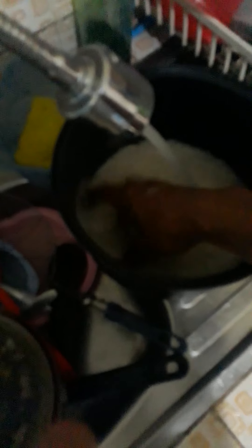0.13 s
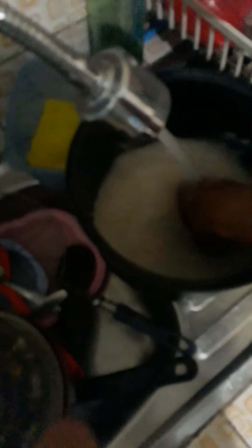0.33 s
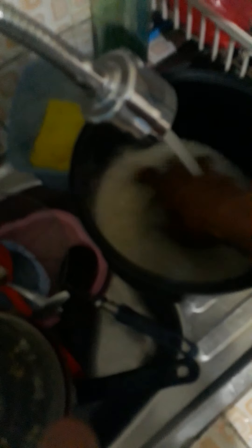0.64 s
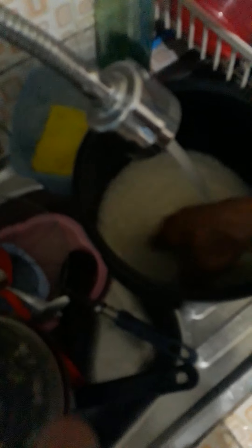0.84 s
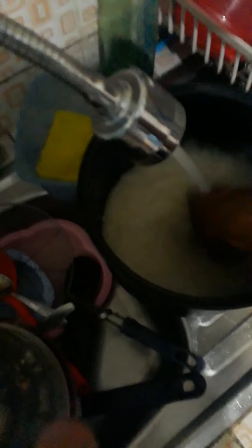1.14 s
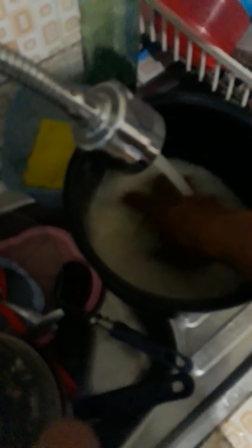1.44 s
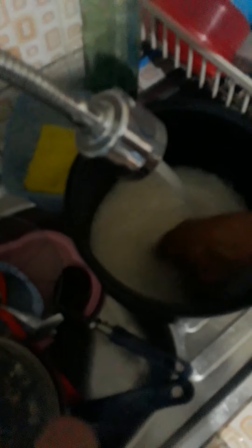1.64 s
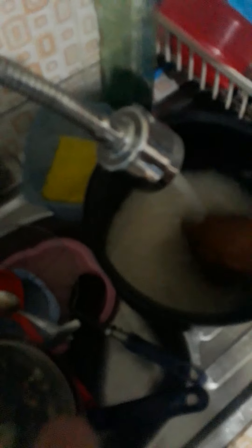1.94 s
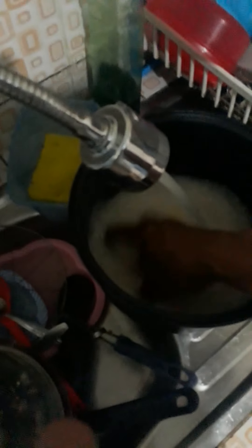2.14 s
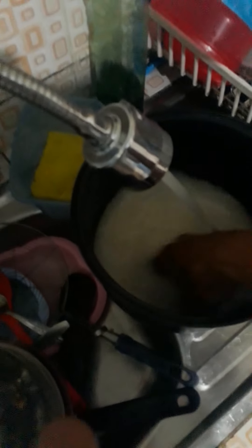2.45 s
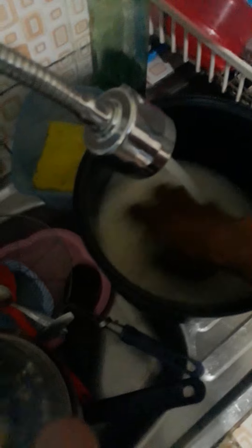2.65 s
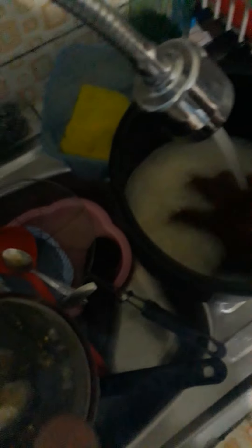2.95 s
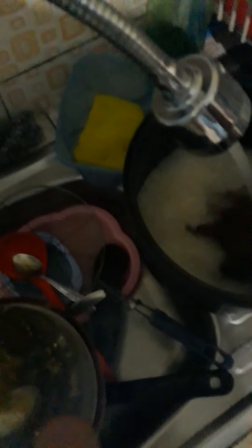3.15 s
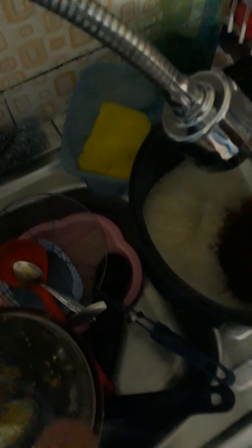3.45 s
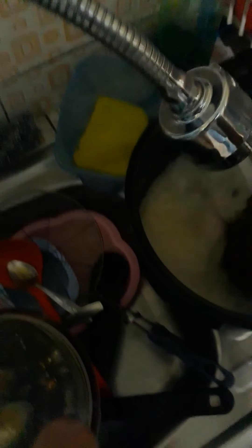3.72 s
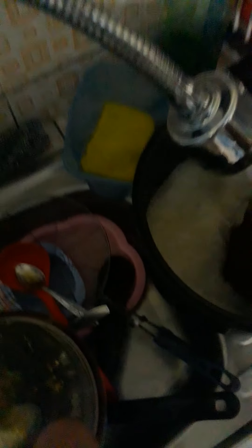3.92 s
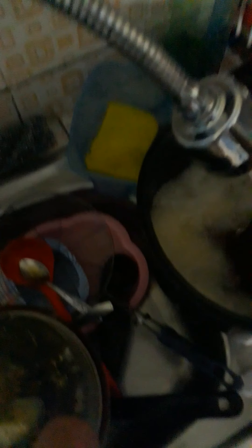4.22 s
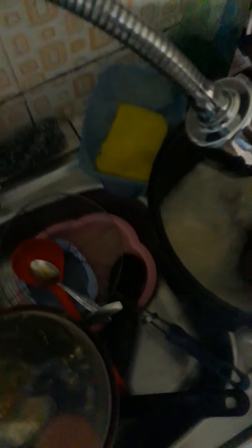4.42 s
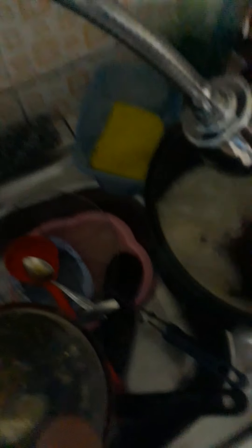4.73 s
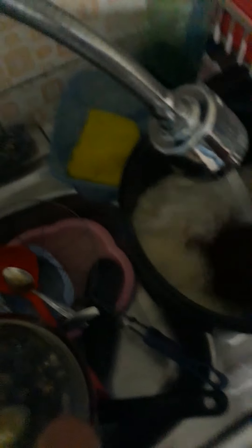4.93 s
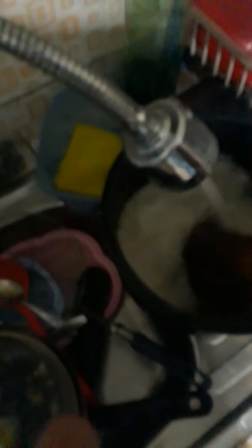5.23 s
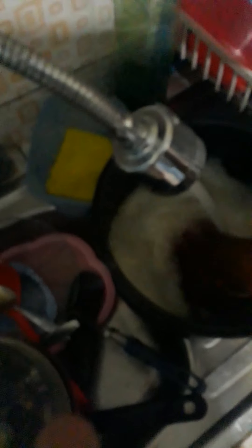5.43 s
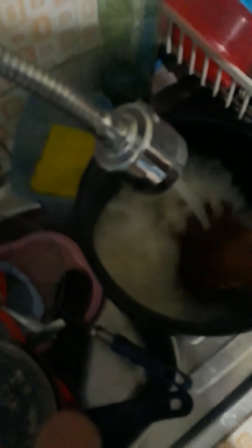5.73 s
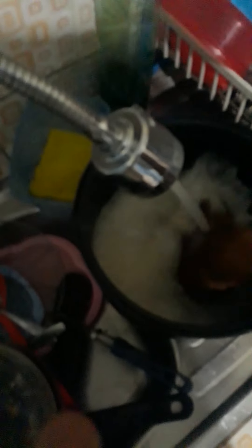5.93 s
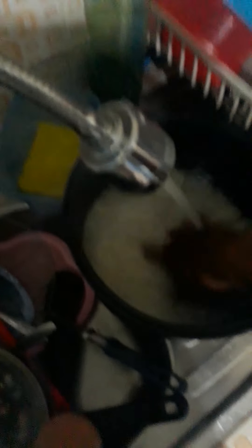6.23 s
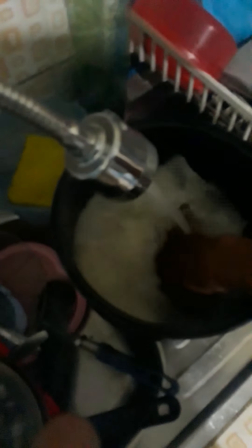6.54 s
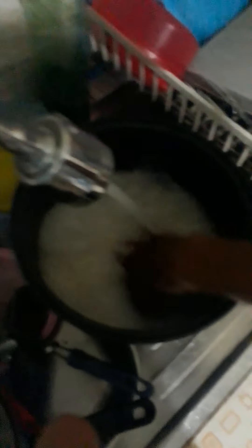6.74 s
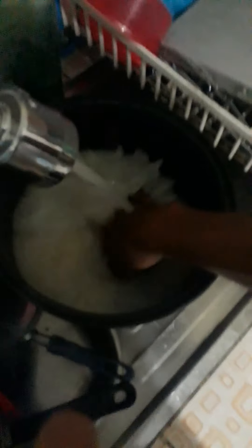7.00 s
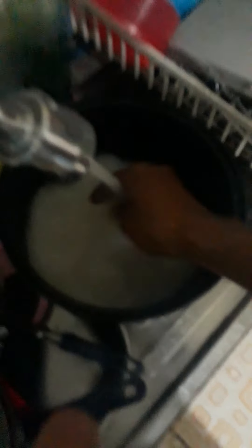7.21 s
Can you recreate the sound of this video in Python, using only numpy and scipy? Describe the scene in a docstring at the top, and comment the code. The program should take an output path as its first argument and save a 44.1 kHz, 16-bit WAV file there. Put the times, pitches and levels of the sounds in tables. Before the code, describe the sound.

Close to a single microphone in a kitchen, rice is rinsed by hand in a pot under a hissing tap. The hand first swirls the water slowly, making soft low gulps, and from about halfway rubs faster, in louder rhythmic sloshes with air glugging under the palm. Small splashes and bubbles dot the fizzing stream, the pot rings lightly with the water, and a machine hums faintly far away.

```python
"""Washing rice under a tap

A kitchen tap runs into a pot while a hand stirs and rubs rice in the water, close to one microphone.
The jet, full of air, hisses and fizzes. Slow wide strokes churn and gulp at first; later, quick rubs
slosh about five times a second and air glugs from under the cupped hand. Bubbles plip, drops smack,
the pot rings along with the water, and a machine hums far off."""
import sys
import numpy as np
from scipy import signal
from scipy.fft import rfft, irfft, next_fast_len
from scipy.io import wavfile
from scipy.ndimage import uniform_filter1d, map_coordinates

SR = 44100
rng = np.random.default_rng(int(sys.argv[2]) if len(sys.argv) > 2 else 0)


def dump(signal):
    """Clip the signal to [-1, 1] and save it as 16-bit WAV at the path in sys.argv[1]."""
    limited = np.clip(np.atleast_2d(signal).T, -1, 1)
    pcm = np.round(limited * 32767).astype(np.int16)
    wavfile.write(sys.argv[1], SR, pcm)


N = 324991
TIME = np.arange(N) / SR


# How loud the jet is on the water. Each row: time in seconds, relative level in dB.
JET_LEVELS = [(0, -30.5), (0.14, -31.5), (0.3, -31.5), (0.8, -32), (1.22, -31), (1.38, -28.5), (1.65, -32),
              (2.4, -32), (3.05, -32.7), (3.65, -30), (4.75, -29.5), (5.5, -30), (6.4, -29), (6.95, -29.5),
              (7.25, -35), (7.37, -31.5)]
# The tone of the spray. Each row: frequency in Hz, relative level in dB.
SPRAY_TONE = [(40, -65), (200, -27), (700, -16.5), (1600, -8.5), (2300, -2.5), (4500, -1), (6300, -3),
              (7400, -2), (7950, -6), (8700, -2), (9500, -10.5), (11300, -6), (13000, -9.5), (15700, -13.5)]

def spray():
    """The airy jet hisses and its tiny droplets tick; it spatters more while the hand moves under it."""
    ticks = swarm(3180, 15800, cycles=1.65, spread_db=1.5, rise=0.016, count=16000, samples=64)
    hiss = clouds(rng.standard_normal(N) + gain_of(-7) * ticks, patchy_db=1.0)
    hiss = normalised(coloured(hiss, SPRAY_TONE))
    hand_lift = gain_of(1.3 * sum(push(start, length) for start, length, *_ in HAND_STROKES))
    return gain_of(3) * level(JET_LEVELS) * hand_lift * hiss * flutter(40, depth_db=0.74)


# The tone of the fizz. Each row: frequency in Hz, relative level in dB.
FIZZ_TONE = [(60, -65), (500, -28), (1200, -14), (1700, -10), (2050, 1.5), (2550, 3), (3300, 0.5),
             (5000, 0), (7000, -10.5), (9500, -35), (15000, -24)]

def fizz():
    """Air driven under by jet and hand breaks into small ringing bubbles; a few tinkle for longer."""
    small = swarm(1587, 9270, cycles=5.9, spread_db=1.0, rise=0.0039, count=11000, samples=384)
    tinkle = swarm(2136, 3705, cycles=18, spread_db=2.5, rise=0.012, count=700, samples=1024)
    bubbles = coloured(small + gain_of(-11.5) * tinkle, FIZZ_TONE)
    bubbles = normalised(clouds(bubbles, patchy_db=2.37))
    air = stirring(column=4, resting=gain_of(1.5) * level(JET_LEVELS))  # the jet also fizzes by itself
    return gain_of(-5) * air * bubbles * flutter(32, depth_db=1.6)


# The hand's strokes, slow at first, then quick. Each row: start in seconds, length in seconds,
# then relative levels in dB for slosh (column 2, counting from 0), churn (3) and fizz (4).
HAND_STROKES = [(0.021, 0.2, -46.5, -50.5, -28.5), (0.285, 0.037, -43.5, -48, -27),
                (0.447, 0.14, -40, -48.5, -26), (0.61, 0.11, -43.5, -47.5, -48),
                (0.866, 0.11, -38, -52, -24.5), (1.006, 0.12, -42.5, -50, -28),
                (1.28, 0.27, -40.5, -45.5, -26.5), (1.659, 0.21, -42.5, -50, -25.5),
                (2.046, 0.13, -50, -51.5, -24), (2.17, 0.093, -37.5, -43, -34),
                (2.457, 0.29, -41.5, -49, -27.5), (2.852, 0.12, -42.5, -53, -27),
                (2.979, 0.12, -33.5, -46, -32), (3.132, 0.05, -39, -54, -27),
                (3.262, 0.061, -39, -47.5, -31), (3.419, 0.1, -39, -56.5, -28),
                (3.598, 0.087, -33, -49, -25), (3.775, 0.13, -36, -51, -29), (3.935, 0.12, -35, -57, -28.5),
                (4.114, 0.12, -37.5, -55, -40), (4.298, 0.094, -30.5, -47.5, -29),
                (4.49, 0.1, -31, -44, -32), (4.649, 0.14, -34, -51.5, -27.5),
                (4.858, 0.12, -34.5, -47.5, -38), (5.028, 0.15, -32.5, -47, -29),
                (5.193, 0.18, -34.5, -49, -28.5), (5.43, 0.125, -35, -48, -27),
                (5.608, 0.13, -33, -51, -22), (5.78, 0.15, -33, -51, -34), (5.978, 0.12, -32.5, -48.5, -23),
                (6.17, 0.11, -29.5, -41.5, -31), (6.36, 0.11, -33, -49, -27), (6.546, 0.085, -31, -53, -27),
                (6.745, 0.095, -35, -48, -27), (6.923, 0.1, -31, -46, -31),
                (7.07, 0.125, -36.5, -52.5, -39)]

def stirring(column, resting, lag_s=0):
    """A gain that swells with each stroke; between strokes the water still moves at a resting level."""
    power = sum((gain_of(row[column]) * push(row[0] + lag_s, row[1])) ** 2 for row in HAND_STROKES)
    return np.sqrt(resting ** 2 + power)


def push(start, length, attack_s=0.028, release_s=0.03):
    """One stroke: the water gathers speed, keeps moving while the hand pushes, then settles."""
    age = TIME - start
    return np.clip(age / attack_s, 0, 1) * np.exp(-np.maximum(age - length, 0) / release_s)


# How far the hand is cupped. Each row: time in seconds, share from 0 (flat) to 1 (fully cupped).
HAND_CUPPING = [(2.9, 0.1), (3.4, 0.63), (7.37, 0.83)]
# The tone of the slosh. Each row: frequency in Hz, relative level in dB.
SLOSH_TONE = [(40, -60), (150, -5), (400, -20), (600, -5.5), (900, 0), (1300, -1), (1900, -2.5), (3000, -2),
              (6000, 16)]

def slosh():
    """Strokes fold in larger bubbles, which ring the pot and, once the hand is cupped, its hollow."""
    bubbles = swarm(460, 3790, cycles=3.3, spread_db=1.46, rise=0.018, count=3200, samples=768)
    bubbles = coloured(bubbles, SLOSH_TONE)
    in_pot = normalised(pot(bubbles, amount=1))
    in_hand = ringing(bubbles, HOLLOW_NOTES, amount=1)
    in_hand = normalised(wavering(in_hand, share=0.0405, hz=7))  # the hollow keeps changing shape
    cupped = np.interp(TIME, *np.transpose(HAND_CUPPING))
    water = np.sqrt(1 - cupped) * in_pot + np.sqrt(cupped) * in_hand
    effort = stirring(column=2, resting=gain_of(-53.5))
    return gain_of(0.5) * effort * water * flutter(19.4, depth_db=2.5)


# The tone of the churn. Each row: frequency in Hz, relative level in dB.
CHURN_TONE = [(30, -45), (160, -18), (250, -2.5), (370, -7), (480, 0), (700, -21), (1500, -30)]

def churn():
    """The hand ploughs through the rice with soft low lumps of sound."""
    lumps = swarm(136, 838, cycles=3.8, spread_db=1.0, rise=0.014, count=1800, samples=1024)
    effort = stirring(column=3, resting=gain_of(-58.5), lag_s=0.008)  # the rice moves after the surface
    return gain_of(1) * effort * normalised(pot(coloured(lumps, CHURN_TONE), amount=0.71))


# Single bubbles, each heard on its own. Each row: start in seconds, relative level in dB, starting pitch in Hz.
SINGLE_BUBBLES = [(0.1075, -11, 3620), (0.317, -15, 3480), (0.4013, -15, 2510), (0.568, -8, 2524),
                  (1.1134, -23.5, 1000), (1.1648, -15, 3300), (1.6856, -10, 3750), (1.918, -19.5, 2310),
                  (2.1885, -14.5, 2540), (2.292, -17, 2550), (2.725, -25, 2820), (2.861, -9.5, 2080),
                  (2.8718, -8.5, 6700), (2.9302, -13, 2530), (3.0056, -20, 1460), (3.498, -11.5, 4060),
                  (3.674, -9.5, 4690), (3.849, -11, 3230), (3.859, -10.5, 3020), (4.0261, -13, 3400),
                  (4.3577, -17, 1950), (4.398, -13, 2780), (4.5662, -6, 2300), (4.7295, -11, 3170),
                  (4.9217, -11, 2940), (5.1304, -13, 2010), (5.4848, -9, 3220), (5.705, -15.5, 1970),
                  (6.4045, -7, 3030), (6.422, -15, 2010), (6.431, -11, 2950), (6.7848, -14, 3140),
                  (6.836, -7.5, 3100)]

def plips(ring_cycles=6.9):
    """A small bubble rings and rises in pitch, amid a short spatter from the splash that made it."""
    out, t = np.zeros(N), np.arange(4096) / SR
    for start, db, hz in SINGLE_BUBBLES:
        age = t * hz / ring_cycles
        tone = np.exp(-age) * np.sin(2 * np.pi * hz * t * (1 + 0.0096 * np.minimum(age, 4)))
        spatter = rng.standard_normal(len(t)) * np.sqrt(SR / hz) * np.exp(-t / 0.011)
        band = signal.butter(2, [hz * 0.68, min(hz * 1.7, SR / 3)], "bandpass", fs=SR)
        add(out, start, gain_of(db) * signal.lfilter(*band, tone + gain_of(-26.5) * spatter))
    return gain_of(-0.5) * pot(out, amount=0.098)


# Thrown drops hitting the water. Each row: start in seconds, relative level in dB,
# brightness in Hz, fading time of the spatter in seconds.
THROWN_DROPS = [(.134, -15.5, 8000, .018), (0.5676, -11.5, 3120, 0.013), (.698, -22, 9000, .014),
                (1.1, -15, 6500, 0.033), (1.298, -16, 3300, .011), (1.681, -16, 3300, 0.019),
                (2.872, -25, 6800, .014), (3.003, -17, 1450, .014), (4.079, -19, 10000, .012),
                (4.226, -14.5, 2980, .01), (4.5512, -8.5, 3240, 0.0032), (4.576, -13, 4500, .016),
                (4.773, -12.5, 4500, 0.019), (5.127, -11.5, 2200, .018), (5.4842, -13, 3300, .004),
                (6.1876, -9, 3900, 0.0036), (6.2514, -7.5, 2400, 0.008), (6.4051, -8, 3600, 0.016),
                (6.784, -7, 4020, .007)]

def smacks():
    """A drop hits with a sharp crack, then scatters into finer spray; small drops sound brighter."""
    out, t = np.zeros(N), np.arange(4096) / SR
    for start, db, hz, spatter_s in THROWN_DROPS:
        crack = np.exp(-t / 0.00061) * np.sin(2 * np.pi * hz * t)
        fade = 0.55 * np.exp(-t / 0.0022) + 0.42 * np.exp(-t / spatter_s)
        spatter = rng.standard_normal(len(t)) * fade
        band = signal.butter(2, [hz / 2, min(hz * 2, SR / 2.5)], "bandpass", fs=SR)
        add(out, start, gain_of(db) * signal.lfilter(*band, crack + spatter))
    return out


# The notes at which the hollow under the cupped hand rings. Each row: pitch in Hz,
# width in Hz (narrow notes ring longer), level in dB above the direct sound.
HOLLOW_NOTES = [(586, 23, 18.5), (1092, 89, 5.5), (1540, 110, 1.5)]
# Glugs from that hollow. Each row: start in seconds, relative dB of the lower note, then of the upper.
HAND_GLUGS = [(3.814, -29.5, -20.5), (4.16, -34, -19.5), (4.226, -36, -18.5), (4.356, -15, -22),
              (4.728, -43, -18.5), (4.875, -48, -15), (5.06, -25, -34), (5.123, -24, -19.5),
              (5.513, -37, -17.5), (5.83, -29, -18.5), (6.047, -32, -24), (6.25, -21, -11),
              (6.471, -28, -20), (6.598, -27, -24), (7.015, -26, -26), (7.167, -23, -40)]

def glugs(ring_cycles=6, climb_per_s=0.77):
    """Air squeezed from the cupped hand sounds its two lowest notes, which climb as the pocket shrinks."""
    out, t = np.zeros(N), np.arange(6000) / SR
    for start, *notes_db in HAND_GLUGS:
        detune = 0.031 * rng.standard_normal()
        for (hz, *_), db in zip(HOLLOW_NOTES, notes_db):
            turns = hz * (1 + detune + climb_per_s * t / 2) * t
            swell = (1 - np.exp(-turns)) * np.exp(-turns / ring_cycles)
            add(out, start, gain_of(db) * swell * np.sin(2 * np.pi * turns))
    return out


# Air pockets under the palm. Each row: start in seconds, relative level in dB, starting pitch in Hz.
AIR_POCKETS = [(0.319, -36, 277), (.721, -32, 303), (1.038, -30.5, 314), (1.313, -27, 346),
               (1.531, -28, 314), (1.808, -33, 303), (1.946, -29.5, 270), (2.189, -40, 326),
               (2.347, -29, 280), (2.609, -27, 310), (3.031, -31, 300), (5.328, -32, 271)]

def gulps(ring_s=0.039):
    """An air pocket shuts under the palm with a short, low, rising note and its overtone."""
    out, t = np.zeros(N), np.arange(6000) / SR
    for start, db, hz in AIR_POCKETS:
        phase = 2 * np.pi * hz * t * (1 + 1.8 * t)
        note = np.sin(phase) + gain_of(-1) * np.sin(1.4 * phase)
        swell = (1 - np.exp(-t / 0.0018)) * gain_of(-60 * t / ring_s)
        add(out, start, gain_of(db) * swell * note)
    return gain_of(-1) * pot(out, amount=0.61)


# One brief plunge of the jet. Each row: time in seconds, relative dB of the rush, then of the air's note.
PLUNGE_LEVELS = [(1.275, -54, -70), (1.305, -23.5, -49), (1.335, -31, -37), (1.37, -24, -42),
                 (1.41, -25.5, -31), (1.46, -26.5, -43), (1.5, -62, -62)]
# The tone of the rush. Each row: frequency in Hz, relative level in dB.
RUSH_TONE = [(60, -54), (500, 3), (1600, -7), (2500, -2), (4300, 7), (5800, 10), (7500, 1), (9500, -28),
             (11300, -21), (15000, -28)]

def plunge(air_hz=353):
    """The jet bores into a hollow beside the hand: a bright rush over the wobbling note of trapped air."""
    rush = normalised(pot(coloured(rng.standard_normal(N), RUSH_TONE), amount=0.27))
    pitch = air_hz * (1 + 0.035 * wander(50))
    note = normalised(np.sin(2 * np.pi * np.cumsum(pitch) / SR) * flutter(60, depth_db=4))
    sound = level(PLUNGE_LEVELS) * rush + gain_of(3) * level(PLUNGE_LEVELS, column=2) * note
    plunging = (TIME > PLUNGE_LEVELS[0][0]) & (TIME < PLUNGE_LEVELS[-1][0])
    return plunging * sound


# The notes at which pot and sink ring. Each row: pitch in Hz, width in Hz,
# level in dB above the direct sound when amount is 1.
POT_NOTES = [(244, 10, 7.5), (293.6, 19, 9.5), (346, 38, 10.5), (462.5, 11.4, 10), (594, 29, 16),
             (793, 11.6, 14), (1022, 78, 8.5), (1076, 43, 10), (1467, 23, 12), (1603, 25, 3)]

def pot(x, amount):
    """Pot and sink ring along with a sound made in the water."""
    return ringing(x, POT_NOTES, amount)


# How long the kitchen echoes. Each row: frequency in Hz, seconds it takes to fade by 60 dB.
ECHO_TIMES = [(200, 0.18), (1000, 0.36), (4000, 0.072), (14000, 0.16)]

def kitchen(x):
    """Sink and tiles throw back a dense, short echo in which the middle pitches last longest."""
    hz, t, noise = signal.stft(rng.standard_normal(SR // 2), SR, nperseg=256)
    fade = gain_of(-60 * t / value_at(ECHO_TIMES, hz)[:, None]) * (t > 0)
    tail = signal.istft(noise * fade, SR, nperseg=256)[1]
    return signal.fftconvolve(x, tail / np.linalg.norm(tail))[:N]


# Low drones of the room. Each row: pitch in Hz, width in Hz, level in dB.
ROOM_DRONES = [(48, 8, -90), (73.4, 27, -67.5), (96.6, 9.3, -65.5)]

def hum(machine_hz=146.8):
    """A distant machine hums on one pitch over the low drone of the room."""
    air_tone = [(20, -22), (60, -4), (130, -4), (300, -14), (2000, -40)]  # each pair: Hz, relative dB
    air = gain_of(-65.5) * normalised(coloured(rng.standard_normal(N), air_tone))
    machine = gain_of(-55) * np.sin(2 * np.pi * machine_hz * TIME) * flutter(4.6, depth_db=1.6)
    return air + machine + sum(gain_of(db) * noise_band(hz, width) for hz, width, db in ROOM_DRONES)


def swarm(low_hz, high_hz, cycles, spread_db, rise, count, samples):
    """Many bubbles at random moments; each rings briefly and climbs in pitch as it nears the surface."""
    when, pitch, strength, ring_length = rng.random((count, 4)).T[:, :, None]
    hz = low_hz * (high_hz / low_hz) ** pitch
    turns = hz * np.arange(samples) / SR
    age = turns / (cycles * (0.5 + ring_length))
    height = gain_of(-spread_db * np.log(strength + 0.055)) * hz  # a few are stronger than the rest
    rings = height * np.exp(-age) * np.sin(2 * np.pi * turns * (1 + rise * np.minimum(age, 4)))
    places = (when * N).astype(int) + np.arange(samples)
    return normalised(np.bincount(places.ravel(), rings.ravel(), N)[:N])


def clouds(x, patchy_db):
    """Bubbles of like size come in short-lived clouds: patches of pitch swell and fade."""
    spectrum = signal.stft(x, nperseg=512, noverlap=384)[2]
    patches = uniform_filter1d(rng.standard_normal(spectrum.shape), size=7, axis=0)  # blur across pitch
    patches = normalised(uniform_filter1d(patches, size=11, axis=1))  # blur across time
    return signal.istft(spectrum * gain_of(patchy_db * patches), nperseg=512, noverlap=384)[1][:N]


def ringing(x, notes, amount):
    """The direct sound plus the notes that it sets ringing."""
    def response(f):
        return 1 + amount * sum(gain_of(db) / (1 + 2j * (f - hz) / width) for hz, width, db in notes)
    return filtered(x, response)


def wavering(x, share, hz):
    """Lets the pitch of a sound drift by a small share, about hz times a second."""
    drift = normalised(filtered(rng.standard_normal(N), lambda f: (f / hz) ** 2 / (1 + (f / hz) ** 6)))
    return map_coordinates(x, [np.arange(N) + np.cumsum(share * drift)], mode="reflect")


def wander(hz):
    """A smooth random curve that swings up to about hz times a second."""
    return normalised(filtered(rng.standard_normal(N), lambda f: 1 / (1 + (f / hz) ** 4)))


def flutter(hz, depth_db):
    """A random gain that makes a level flicker."""
    return gain_of(depth_db * wander(hz))


def noise_band(hz, width):
    """Noise gathered closely around one pitch."""
    return normalised(filtered(rng.standard_normal(N), lambda f: 1 / (1 + 2j * (f - hz) / width) ** 2))


def coloured(x, tone):
    """Shapes the lows and highs of a sound with a tone table."""
    return filtered(x, lambda hz: gain_of(value_at(tone, hz)))


def filtered(x, response):
    """Multiplies each frequency in a sound by response(hz)."""
    size = next_fast_len(N + SR // 2)
    return irfft(rfft(x, size) * response(np.fft.rfftfreq(size, 1 / SR)), size)[:N]


def value_at(table, hz):
    """Looks up a frequency in a table, sliding between rows on a musical (log) scale."""
    row_hz, values = np.transpose(table)
    return np.interp(np.log(hz + 1), np.log(row_hz + 1), values)


def level(table, column=1):
    """Turns a table of times and dB into a gain for every sample."""
    rows = np.array(table)
    return gain_of(np.interp(TIME, rows[:, 0], rows[:, column]))


def gain_of(db):
    """Turns decibels into a gain, the number to multiply a sound by."""
    return 10 ** (np.asarray(db) / 20)


def normalised(x):
    """Scales a signal to an average (rms) size of 1."""
    return x / np.sqrt(np.mean(x ** 2) + 1e-20)


def add(mix, start_s, sound):
    """Adds a sound to the mix at its start time."""
    part = mix[round(start_s * SR):][:len(sound)]
    part += sound[:len(part)]


def scene():
    """All the water in one spot, with the kitchen's echo and hum, alike in both channels."""
    wash = spray() + fizz() + slosh() + churn() + plunge()
    drops = plips() + smacks() + gulps() + glugs()
    echo = kitchen(gain_of(-12.5) * wash + gain_of(-7) * drops)
    mono = wash + drops + echo + hum()
    return np.array([mono, mono])


def record(dry):
    """The deepest bass and the highest treble are cut away."""
    low_hz, high_hz = 42, 15780
    bass_cut = signal.butter(3, low_hz, "highpass", fs=SR, output="sos")
    treble_cut = signal.firwin(511, high_hz, window=("kaiser", 9), fs=SR)
    return signal.oaconvolve(signal.sosfilt(bass_cut, dry), treble_cut[None], "same")


dry = scene()
out = record(dry)
dump(out)
```